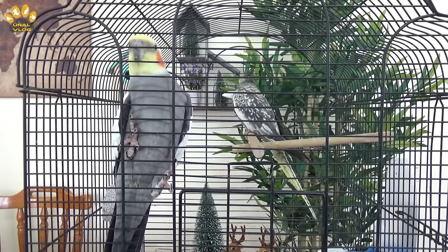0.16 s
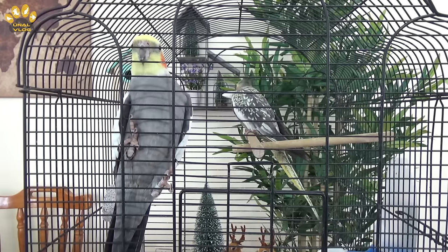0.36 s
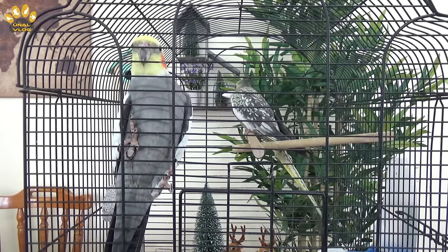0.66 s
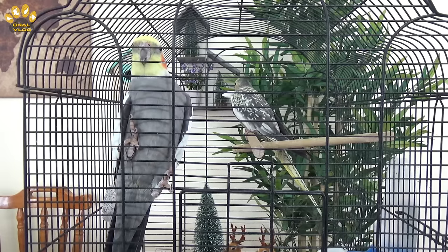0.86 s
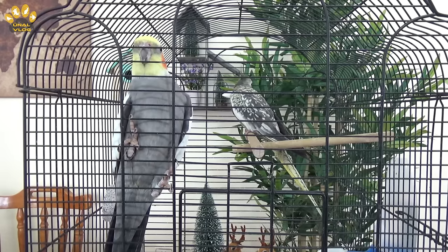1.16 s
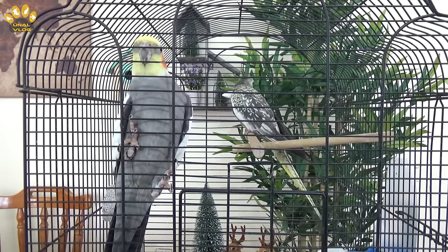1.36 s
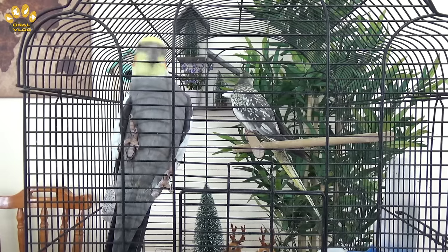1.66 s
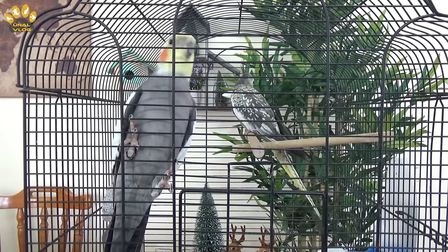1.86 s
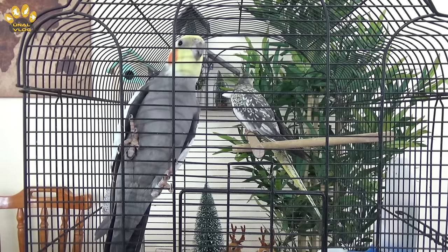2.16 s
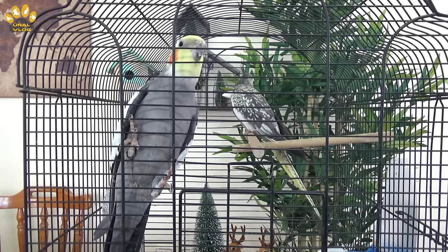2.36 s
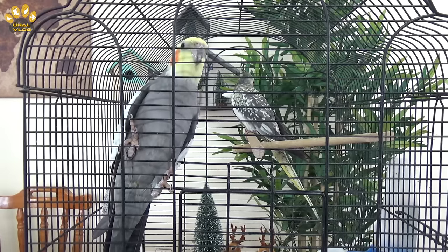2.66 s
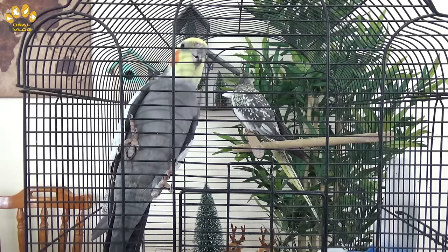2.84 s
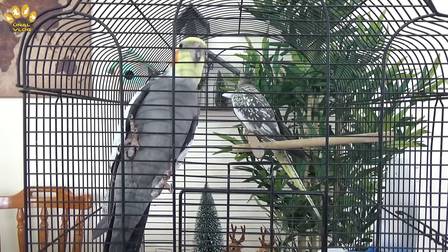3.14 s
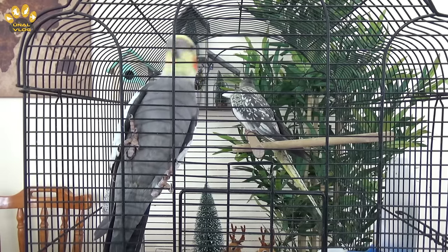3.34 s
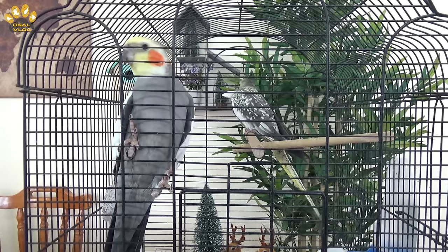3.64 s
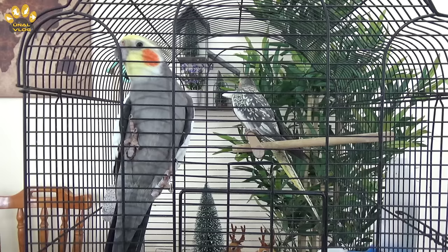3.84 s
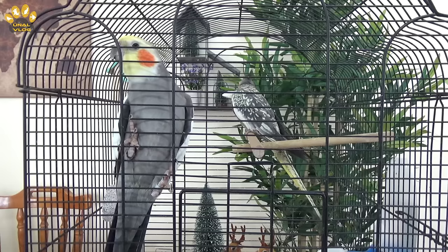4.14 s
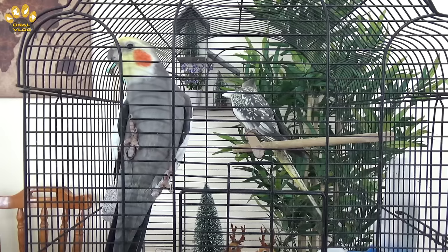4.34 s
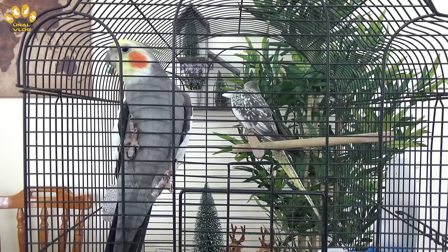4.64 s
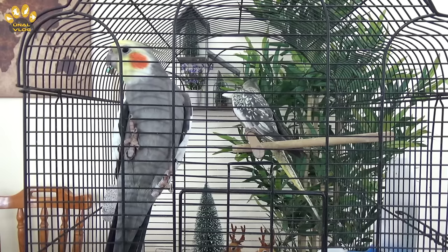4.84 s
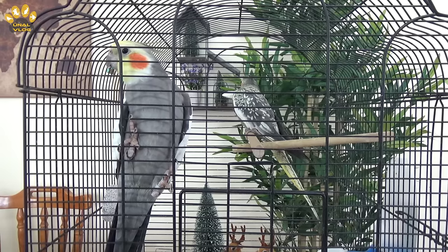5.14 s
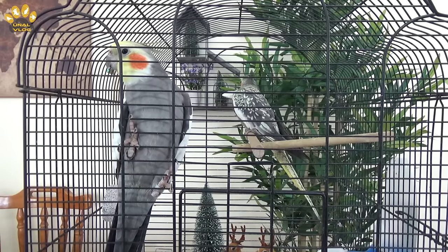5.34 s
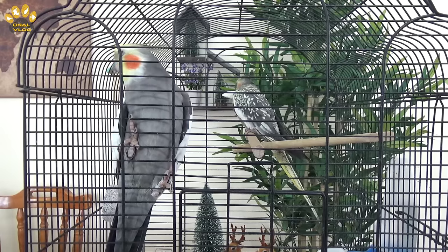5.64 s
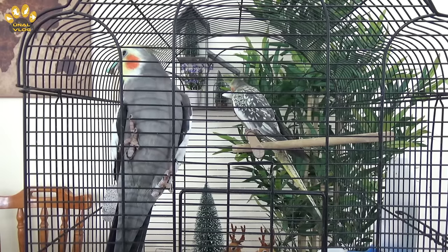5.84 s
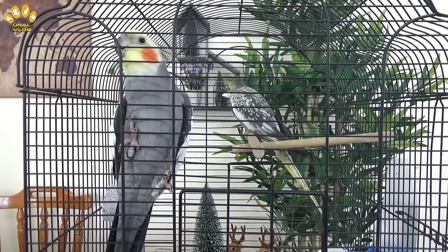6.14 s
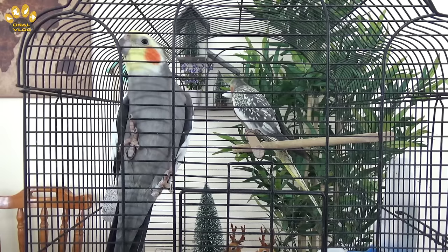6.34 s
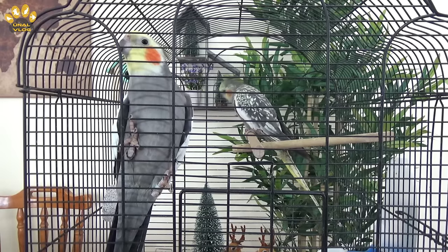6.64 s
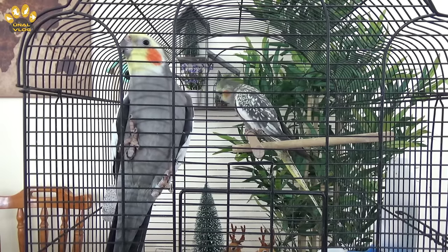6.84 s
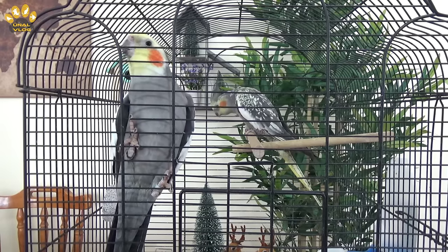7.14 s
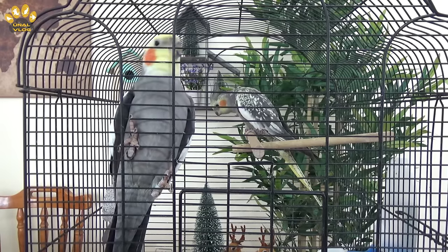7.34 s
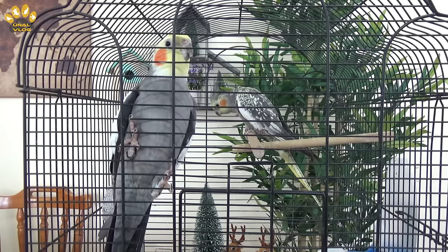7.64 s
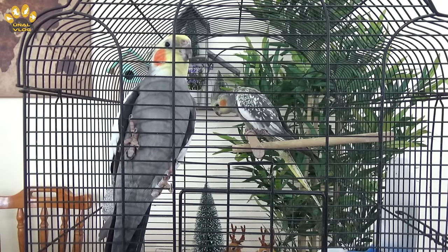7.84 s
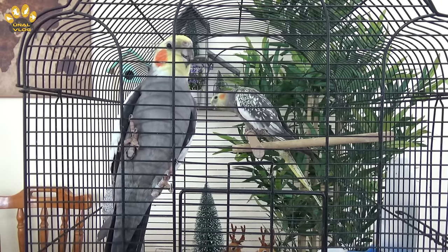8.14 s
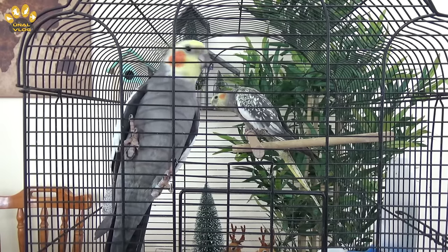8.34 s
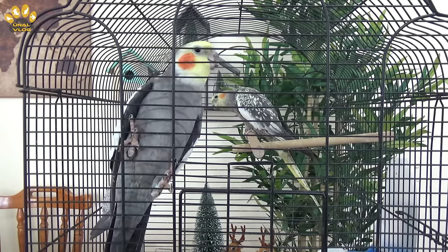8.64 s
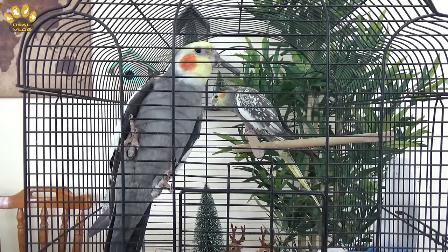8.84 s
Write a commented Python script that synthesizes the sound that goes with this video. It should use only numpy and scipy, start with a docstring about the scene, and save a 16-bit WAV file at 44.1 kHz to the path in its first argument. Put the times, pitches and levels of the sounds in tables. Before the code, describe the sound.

A cockatiel sings close by in a wire cage in a living room with faint steady noise and short reverberation. For the first 1.8 seconds it is quiet: a dull knock at 0.25, a soft hiss and chirp near 0.5, beak clicks, a raspier hiss at 1.25 and a wire tap at 1.6. Two loud, steeply falling whistles come at 1.8 and 2.0, then a rising held note at 2.2, a brief low note, a piercing high one at 2.8 and a warbling one at 3.15. Another falling pair at 3.85 and 4.05 leads to a softer held note at 4.3. From 5.1 to 5.8 there are small chirps and hisses. Whistles return at 5.9, with high notes at 6.1 and 7.0, held notes at 6.4 and 7.3, and rasps between. Quiet chirps follow from 7.8, then falling whistles at 8.5 and 8.7 and a short final note near 9.0.

```python
"""Clear whistles, raspy hisses and soft chirps: a cockatiel sings in a wire cage in a living room, close by.
Its beak clicks and taps the wires; soft rustles, dull knocks and steady room noise lie underneath.
Whistles and chirps are sine tones with overtones. Hisses, contacts and rustles are shaped noise.
The room rings briefly after every note, and a limiter holds down the loudest ones."""
import sys
import numpy as np
from scipy import signal
from scipy.fft import rfft, irfft
from scipy.io import wavfile
from scipy.ndimage import uniform_filter1d

SR = 44100
rng = np.random.default_rng(int(sys.argv[2]) if len(sys.argv) > 2 else 0)


def master(y):
    """Save y as 16-bit WAV."""
    cut = np.clip(np.atleast_2d(y).T, -1, 1)
    pcm = np.round(cut * 32767)  # scale
    wavfile.write(sys.argv[1], SR, pcm.astype(np.int16))


N = 396459
TIME = np.arange(N) / SR
CUTOFF_HZ = 15900  # nothing much is heard above this

# Colour of the steady room noise. Each row: frequency in Hz, level in dB.
ROOM_NOISE_COLOUR = [(25, -14.5), (50, -4.5), (80, -9), (120, -1), (250, -4.5), (600, -11.5), (1200, -13),
                     (2000, -7.5), (6000, -19), (10000, -25), (16000, -31.5)]
# How long the room rings. Each row: frequency in Hz, time to die away by 60 dB in seconds.
ROOM_DECAY = [(200, 0.26), (1500, 0.43), (3000, 0.35), (6000, 0.33), (10000, 0.29), (16000, 0.28)]

# Soft rustles. Each row: start in seconds, rise in seconds, level in dB,
# basic fade in dB per second (sped up or slowed down separately for low and high pitches).
RUSTLES = [(.45, 0.15, -50, 43.5), (3.49, 0.09, -49.5, 56), (4.58, .16, -44.5, 36),
           (5.501, 0.53, -55, 20.5)]
# Colour of the rustles. Each row: frequency in Hz, level in dB.
RUSTLE_COLOUR = [(100, -15.5), (300, -3), (750, -4), (1300, -1), (2200, -1), (4000, -17), (7000, -7),
                 (10000, -8.5), (16000, -14.5)]
# Faint ringing in the rustles. Each row: frequency in Hz, relative level in dB.
RUSTLE_RINGS = [(410, -10), (585, -2.5), (780, 1)]
RUSTLE_RISE_DB = 21  # each swells by this much
RUSTLE_SPLIT_HZ = 3500  # low and high parts fade at different speeds
RUSTLE_LOW_HASTE, RUSTLE_HIGH_HASTE = 0.89, 2.2  # times the basic fade

# Low flutter under the loudest notes. Each row: frequency in Hz, level in dB.
FLUTTER_COLOUR = [(40, -1), (130, 2), (300, -5.5), (700, -10.5), (2500, -48.5)]

# Dull knocks. Each row: start in seconds, level in dB, time to die to about a third in seconds.
KNOCKS = [(.245, -51, 0.04), (8.357, -54, 0.12)]
# Colour of the knocks. Each row: frequency in Hz, level in dB.
KNOCK_COLOUR = [(300, -10), (800, -13.5), (1700, 3.5), (3000, -5), (5000, -16), (16000, -34)]
# Dry beak clicks. Each row: start in seconds, level in dB, time to die to about a third in seconds.
BEAK_CLICKS = [(.711, -39, 0.0047), (.745, -33, 0.0018), (1.495, -29.5, 0.01), (2.0, -21.5, 0.00067),
               (2.982, -53, 0.0023), (2.992, -43, 0.003), (3.683, -39, 0.0026), (4.243, -43, 0.003),
               (4.311, -36, 0.0018), (4.572, -28.5, 0.0029), (4.878, -36.5, 0.0044), (5.863, -29.5, 0.0024),
               (6.249, -28.5, 0.0022), (7.157, -29, 0.0019)]
# Colour of the clicks. Each row: frequency in Hz, level in dB.
BEAK_CLICK_COLOUR = [(300, -41.5), (1000, -19.5), (1600, 9), (4000, 1), (7000, 2), (10000, -7),
                     (16000, -8.5)]
# Taps on the cage wires. Each row: start in seconds, level in dB, time to die to about a third in seconds.
WIRE_TAPS = [(1.58, -19.5, 0.02035), (1.79, -25, 0.013), (2.2, -30.5, 0.0377), (2.493, -26.5, .022)]
# Colour of the taps. Each row: frequency in Hz, level in dB.
WIRE_TAP_COLOUR = [(150, -29), (400, -0.5), (700, 1.5), (1500, 5), (3000, -3), (4800, -9), (7500, -0.5),
                   (11000, -0.5), (16000, -2)]

# Raspy hisses. Each row: start in seconds, rise in seconds, fall in seconds, level in dB,
# main throat resonance in Hz, focus on the resonances (0 plain hiss, 1 all resonance).
RASPS = [ (0.466, 0.02, 0.01, -35.5, 5400, 0.05), (1.249, 0.00092, 0.064, -24, 5840, 0.12),
         (5.27, 0.029, 0.01, -31.5, 6240, 0.02), (5.39, 0.01, 0.03, -32.5, 4840, 0.37),
         (5.408, 0.012, 0.016, -21, 6270, 0.96), (6.054, 0.0059, 0.094, -41, 6740, 0.1),
         (6.084, 0.017, 0.0083, -23, 5520, 0.24), (6.681, 0.054, 0.062, -25.5, 6174, 1),
         (6.837, 0.035, 0.067, -33, 5200, 0.07), (7.394, 0.035, 0.034, -30, 5730, 1),
         (7.626, 0.027, 0.049, -40.5, 6500, 0.2), ]
# Colour of the breath behind the hisses. Each row: frequency in Hz, level in dB.
BREATH_COLOUR = [(900, -26.5), (1500, -7.5), (2200, -2.5), (4000, -0.5), (6500, 3), (9000, -5.5),
                 (13000, -16.5), (16000, -25.5)]

# Soft chirps between the phrases. Each row: start in seconds, length in seconds, first pitch in Hz,
# middle pitch in Hz, last pitch in Hz, level in dB, overtone boost in dB, roughness (0 smooth, about 1 rough).
CHIRPS = [ (0.49, 0.032, 2330, 2455, 2730, -44.5, 1.5, 0.42),
          (.986, .08, 2850, 3680, 2100, -51.5, -12.5, 0.48),
          (1.151, 0.0357, 1490, 1420, 1380, -55, -18.5, 0.71),
          (5.135, 0.053, 3340, 2155, 1890, -57.5, -6, 0.31),
          (5.524, 0.08, 1930, 3095, 1938, -40, -19, 1.17),
          (5.674, 0.054, 3290, 2627, 2390, -47.5, -1.5, 0.71),
          (5.737, 0.0265, 1570, 1546, 1385, -48.5, -21, 0.5), (5.803, 0.027, 2960, 3820, 3830, -43, -13, 1),
          (7.79, .043, 3420, 3640, 3660, -53.5, -15.5, 0.42),
          (7.847, .099, 2040, 2353, 1862, -57.5, -26, 1.05),
          (7.96, 0.058, 3590, 3660, 3570, -49.5, -24, 0.71),
          (8.102, 0.077, 5610, 5810, 3620, -45.5, -6, 1.11), (8.191, .069, 3050, 3047, 2575, -53, -13, 1),
          (8.349, 0.24, 1840, 2180, 2065, -60.5, -19, 1.17), ]
# Throat colour of chirp overtones, before a boost that grows with order. Each row: frequency in Hz, level in dB.
CHIRP_OVERTONES = [(2800, 16.5), (5000, 7.5), (7500, 0), (10000, -17), (15000, -34)]

# Throat colour of whistle overtones, before a cut that grows with order. Each row: frequency in Hz, level in dB.
WHISTLE_OVERTONES = [(2500, -11), (3100, -29), (4000, -23.5), (5500, -27), (7000, -28.5), (8500, -31.5),
                     (11000, -29), (13500, -22), (16000, -37)]
EDGE_S = 0.0031  # the voice switches on and off this fast
PITCH_TREMOR, PITCH_TREMOR_PER_S = 0.0053, 85  # share of the pitch, turns per second
SHIMMER_DB, SHIMMER_PER_S = 1.5, 71  # tremor of the overtones

# Falling whistles in pairs. Each row: start in seconds, length in seconds, reference top pitch in Hz,
# level before fading in dB, reference fade in dB, treble boost at 9 kHz in dB.
SLURS = [ (1.818, 0.12, 2747, -7.5, 16, 1), (2, .146, 2865, -4.5, 21, 2.5),
         (3.85, 0.13, 2827, -9.5, 18, -4), (4.044, .145, 2914, -7.5, 20.5, -1),
         (8.529, 0.13, 2834, -7, 21.5, 1.5), (8.725, 0.14, 2853, -7, 23, 1), ]
# The fall every slur follows. Each row: share of its length, share of the top pitch, share of the fade.
SLUR_SHAPE = [(0, 0.99, 0.31), (.17, 0.9793, 0.11), (.31, .865, 0.13), (.47, .7, .58), (.68, .618, .68),
              (.88, .527, 0.81), (1, 0.45, 1.38)]

# Loud high notes with a dip. Each row: start in seconds, length in seconds, first pitch in Hz, dip pitch in Hz,
# last pitch in Hz, time to reach the dip in seconds, level after the attack in dB, treble boost at 9 kHz in dB.
HIGH_NOTES = [ (2.844, .136, 2792, 2490, 2630, .08, -11.5, 0), (6.112, .14, 2826, 2668, 2815, 0.049, -6, 0),
              (7.034, .128, 2835, 2642, 2764, 0.0502, -8, -2.5), ]
HIGH_HOLD_S = 0.013  # the pitch holds before the dip
HIGH_ATTACK_S, HIGH_ATTACK_DB = 0.012, 8.5  # the level comes up from this far below

# Held notes. Each row: start in seconds, length in seconds, first pitch in Hz, last pitch in Hz,
# bend (1 straight, more for a late glide, less for an early one), starting scoop in Hz, ending flick in Hz,
# warble reached at the end in Hz, mid-note level in dB, swell over the note in dB, treble boost at 9 kHz in dB.
HELD_NOTES = [ (2.24, 0.25, 1756, 1924, .35, 210, 268, 10.5, -12, 7, -2.5),
              (2.685, 0.05254, 1271, 1480, 3.2, -0.5, 457.5, 0.5, -24.5, -5.5, 0.5),
              (3.154, 0.26, 2049, 1975, 2.83, -35, 67.5, 36, -16, 0.5, 2),
              (4.292, .279, 1443, 1554, 0.93, 442, -110, 0.5, -25, 5, -4),
              (5.881, 0.135, 1869, 1994, 0.83, 13.5, -27.5, 25.5, -16.5, 4, 1.5),
              (6.417, 0.25, 1590, 1760, 5.62, 220.5, -280, 0.5, -21, 0, -5.5),
              (6.856, .065, 1250, 1345, 2, -1, 701.5, -2, -30, -3, -8),
              (7.303, 0.29, 1439, 1903, .8, 132.5, -130, 11.5, -21.5, 9.5, -0.5),
              (8.966, .06, 1774, 1732, 0.94, 84, 0, -9.5, -20, 1.5, 1.5), ]
SCOOP_S, FLICK_S = 0.028, 0.014  # slides on to its pitch, flicks off it
HELD_ATTACK_S, HELD_ATTACK_DB, HELD_RELEASE_DB = 0.03, 8.5, 3
WANDER, WANDER_DB, WANDER_PER_S = 0.0032, 1.08, 10  # slow straying: share of pitch, loudness, turns per second
WARBLE_PER_S, WARBLE_DB_PER_HZ = 10.59, -0.01  # the level drops slightly as the warble lifts the pitch


def from_db(db):
    """Turn decibels into gain."""
    return 10 ** (np.asarray(db) / 20)


def rms_one(x):
    """Scale a sound to an average strength (rms) of 1."""
    return x / np.sqrt(np.mean(x ** 2) + 1e-20)


def at_hz(points, hz):
    """Read a colour table at any frequency, on a log-frequency axis."""
    table_hz, value = np.transpose(points)
    return np.interp(np.log(np.maximum(hz, 1)), np.log(table_hz), value)


def at_time(rows, t):
    """Read the columns of a curve at the times t."""
    table_time, *columns = np.transpose(rows)
    return [np.interp(t, table_time, column) for column in columns]


def ramp(t, length):
    """Go from 0 to 1 over `length`, then stay."""
    return np.clip(t / length, 0, 1)


def noise(colour, size):
    """Make noise of a given colour, rms 1, by reshaping the spectrum of white noise."""
    white = rfft(rng.standard_normal(size))
    gain = from_db(at_hz(colour, np.fft.rfftfreq(size, 1 / SR)))
    return rms_one(irfft(white * gain, size))


def waver(rate, size=N):
    """Smooth chance movement with about `rate` turns a second, rms 1."""
    r = np.exp(-2 * np.pi * rate / SR)
    return rms_one(signal.lfilter([1], [1, -2 * r, r * r], rng.standard_normal(size)))


def resonate(x, hz, width_hz):
    """A resonance applied twice, for steep skirts; gain 1 at its peak."""
    r = np.exp(-np.pi * width_hz / SR)
    b = np.array([1, 0, -1]) * (1 - r * r) / 2
    a = [1, -2 * r * np.cos(2 * np.pi * hz / SR), r * r]
    return signal.lfilter(b, a, signal.lfilter(b, a, x))


def background(level_db=-65.5, side_db=-12.0):
    """Steady room noise: a shared middle plus a weaker part opposite in the two channels."""
    middle = noise(ROOM_NOISE_COLOUR, N)
    side = from_db(side_db) * noise(ROOM_NOISE_COLOUR, N) * [[1], [-1]]
    return from_db(level_db) * (middle + side)


def rustle_swells(haste):
    """Strength of the rustles over time, fading `haste` times as fast as the basic fade."""
    total = np.zeros(N)
    for start, rise, level_db, fade in RUSTLES:
        t = TIME - start
        rise_db = -RUSTLE_RISE_DB * (1 - ramp(t, rise))
        fade_db = -haste * fade * np.maximum(t - rise, 0)
        total += from_db(level_db + rise_db + fade_db) * (t > 0)
    return total


def rustles(grain_db=3.0, ring_db=8.0, ring_width_hz=35):
    """Grainy noise that swells and fades, the treble faster, with a few faint resonances."""
    grains = from_db(grain_db * waver(250)) * noise(RUSTLE_COLOUR, N)
    low_pass = signal.butter(3, RUSTLE_SPLIT_HZ, "low", fs=SR, output="sos")
    high_pass = signal.butter(3, RUSTLE_SPLIT_HZ, "high", fs=SR, output="sos")
    low = rustle_swells(RUSTLE_LOW_HASTE) * signal.sosfilt(low_pass, grains)
    high = rustle_swells(RUSTLE_HIGH_HASTE) * signal.sosfilt(high_pass, grains)
    rings = np.zeros(N)
    for hz, db in RUSTLE_RINGS:
        rings += from_db(ring_db + db) * resonate(low, hz, ring_width_hz)
    return low + high + rings


def low_flutter(song, flutter_db=-39.5):
    """Faint, lumpy low noise whose strength follows the power of the whistles, up to a limit."""
    power = uniform_filter1d(song ** 2, size=400)
    lumps = from_db(flutter_db + 4.3 * waver(60))
    return lumps * np.minimum(power, 0.15) * noise(FLUTTER_COLOUR, N)


def contacts(events, colour):
    """Each contact is a sudden burst of fine chatter that dies away exponentially."""
    out, chatter = np.zeros(N), noise(colour, N)
    for start, level_db, length in events:
        on = (TIME >= start) & (TIME < start + 10 * length)
        decay = np.exp((start - TIME[on]) / length)
        out[on] += from_db(level_db) * decay * chatter[on]
    return out


def wire_taps(lag_s=0.014):
    """Bending waves in a wire run slower at low pitch, so a tap sweeps downwards."""
    hz = np.fft.rfftfreq(N, 1 / SR)
    # No delay from 4 kHz up; half of lag_s at 1 kHz
    delay = lag_s * np.maximum(np.sqrt(1000 / np.maximum(hz, 100)) - 0.5, 0)
    # Adding up the delay over frequency gives the phase turn that causes it
    phase = 2 * np.pi * np.cumsum(delay) * SR / N
    return irfft(rfft(contacts(WIRE_TAPS, WIRE_TAP_COLOUR)) * np.exp(-1j * phase), N)


def rasps(grain_db=0.5):
    """Fluttering hiss through a throat with weaker resonances an octave either side of the main one."""
    out, hiss = np.zeros(N), noise(BREATH_COLOUR, N) * from_db(grain_db * waver(180))
    for start, rise, fall, level_db, hz, focus in RASPS:
        on = (TIME >= start) & (TIME < start + rise + 2 * fall)
        t, air = TIME[on] - start, rms_one(hiss[on])
        throat = resonate(air, hz, 1600)
        throat += 0.47 * resonate(air, hz / 2, 1300)
        throat += 0.53 * resonate(air, 2 * hz, 2200)
        swell = np.minimum(t / rise, 1) * np.exp(-2 * (np.maximum(t - rise, 0) / fall) ** 2)
        rasp = np.sqrt(focus) * rms_one(throat) + np.sqrt(1 - focus) * air
        out[on] += from_db(level_db) * swell * rasp
    return out


def syrinx(pitch, overtones, brightness_db, tilt_db):
    """The bird's voice: a sine plus overtones shaped by the throat, with a tilt from order to order."""
    phase = 2 * np.pi * np.cumsum(pitch) / SR
    tone = np.sin(phase)
    for order in np.arange(2, 11):
        hz = order * pitch
        overtone_db = at_hz(overtones, hz) + brightness_db(hz) + tilt_db * (order - 2) / 2
        tone += from_db(overtone_db) * (hz < CUTOFF_HZ) * np.sin(order * phase)
    return np.sqrt(2) * tone


def chirps(jitter=0.05, shimmer_db=4.4):
    """Muttered arcs of pitch; the rough ones jump about in pitch and loudness."""
    out, tremor, shimmer = np.zeros(N), waver(330), waver(320)
    for start, length, first_hz, middle_hz, last_hz, level_db, overtones_db, rough in CHIRPS:
        on = (TIME > start) & (TIME < start + length)
        along = (TIME[on] - start) / length
        arc = np.interp(along, [0, 0.5, 1], [first_hz, middle_hz, last_hz])
        pitch = arc * (1 + rough * jitter * tremor[on])
        arch = np.sqrt(np.abs(np.sin(np.pi * along)))
        swell = arch * from_db(level_db + rough * shimmer_db * shimmer[on])
        out[on] += swell * syrinx(pitch, CHIRP_OVERTONES, lambda hz: overtones_db, tilt_db=5.5)
    return out


def note_time(length):
    """Seconds since the start of a note."""
    return np.arange(int(length * SR)) / SR


def add_whistle(out, start, pitch, level_db, treble_db):
    """Sing one smooth, slightly trembling glide into `out`; treble_db brightens or dulls its overtones."""
    t, first = np.arange(len(pitch)) / SR, int(start * SR)
    tremor = waver(PITCH_TREMOR_PER_S, size=SR)[-len(t):]
    shimmer = waver(SHIMMER_PER_S, size=SR)[-len(t):]
    pitch = uniform_filter1d(pitch, size=400, mode="nearest") * (1 + PITCH_TREMOR * tremor)
    gate = np.sin(np.pi / 2 * ramp(np.minimum(t, t[-1] - t), EDGE_S))

    def brightness_db(hz):
        """The treble boost grows with frequency, and the shimmer moves all overtones."""
        return treble_db * hz / 9000 + SHIMMER_DB * shimmer

    tone = syrinx(pitch, WHISTLE_OVERTONES, brightness_db, tilt_db=-4.5)
    out[first:first + len(t)] += (from_db(level_db) * gate * tone)[:N - first]


def held_notes():
    """Each slides on to its pitch, glides while its level drifts and it warbles, and ends in a quick flick."""
    out = np.zeros(N)
    for (start, length, first_hz, last_hz, bend, scoop_hz, flick_hz, warble_hz,
         level_db, swell_db, treble_db) in HELD_NOTES:
        t = note_time(length)
        along, ending = t / length, ramp(t - length + FLICK_S, FLICK_S)
        stray = waver(WANDER_PER_S, size=SR)[-len(t):]
        warble = warble_hz * along * np.cos(2 * np.pi * WARBLE_PER_S * t)
        glide = first_hz + (last_hz - first_hz) * along ** bend
        scoop = scoop_hz * (1 - ramp(t, SCOOP_S))
        pitch = glide * (1 + WANDER * stray) + scoop + flick_hz * ending + warble
        attack_db = -HELD_ATTACK_DB * (1 - ramp(t, HELD_ATTACK_S))
        envelope_db = swell_db * (along - 0.5) + attack_db - HELD_RELEASE_DB * ending
        wander_db = WANDER_DB * stray + WARBLE_DB_PER_HZ * warble
        add_whistle(out, start, pitch, level_db + envelope_db + wander_db, treble_db)
    return out


def high_notes():
    """Full-force notes: the pitch holds, eases down into a dip and climbs steadily again."""
    out = np.zeros(N)
    for start, length, first_hz, dip_hz, last_hz, dip_s, level_db, treble_db in HIGH_NOTES:
        t = note_time(length)
        sink = np.sin(np.pi / 2 * ramp(t - HIGH_HOLD_S, dip_s - HIGH_HOLD_S)) ** 2
        climb = ramp(t - dip_s, length - dip_s)
        pitch = first_hz + (dip_hz - first_hz) * sink + (last_hz - dip_hz) * climb
        attack_db = -HIGH_ATTACK_DB * (1 - ramp(t, HIGH_ATTACK_S))
        add_whistle(out, start, pitch, level_db + attack_db, treble_db)
    return out


def slurs():
    """Each slur starts near its top pitch and falls a little over an octave, fading as it goes."""
    out = np.zeros(N)
    for start, length, top_hz, level_db, fade_db, treble_db in SLURS:
        fall, fade = at_time(SLUR_SHAPE, note_time(length) / length)
        add_whistle(out, start, top_hz * fall, level_db - fade_db * fade, treble_db)
    return out


def room(x, wet_db, treble_db, side_db, gap_s=0.0042):
    """Dense wall reflections, each band with its own decay; nearly alike at two close microphone ports."""
    t = TIME[:SR * 3 // 4]
    hz = np.fft.rfftfreq(len(t), 1 / SR)
    white = rfft(rng.standard_normal((2, len(t))))
    centres, tail = np.array(ROOM_DECAY)[:, 0], 0
    for share, (centre, t60) in zip(np.eye(len(centres)), ROOM_DECAY):
        decay = from_db(-60 * t / t60) * (t > gap_s)  # a short gap before the first reflection
        decay = decay / np.sqrt(np.sum(decay ** 2))
        band = irfft(white * np.interp(hz, centres, share), len(t))
        tail = tail + band * decay * from_db(treble_db * (centre > 4500))
    mid, side = signal.fftconvolve(x[None], tail, axes=1)[:, :N]
    return from_db(wet_db) * (mid + from_db(side_db) * side * [[1], [-1]])


def scene():
    """The bird sits a little left of centre; its hisses and chirps spread into the room more than its whistles."""
    song = slurs() + high_notes() + held_notes()
    close = song + wire_taps()
    noises = chirps() + rasps()
    noises += contacts(BEAK_CLICKS, BEAK_CLICK_COLOUR) + contacts(KNOCKS, KNOCK_COLOUR)
    reflections = room(close, wet_db=-12.0, treble_db=-2.0, side_db=-27.5)
    reflections += room(noises, wet_db=1.5, treble_db=-3.0, side_db=-18.5)
    pan = from_db([[0.54], [-0.54]])  # left, right
    bird = (close + noises + reflections) * pan
    return bird + low_flutter(song) + rustles() + background()


def record(dry, ceiling_db=-9.0, release_db_per_s=148.5):
    """A fast limiter flattens the loudest whistles, then a steep filter cuts the top."""
    level_db = 20 * np.log10(np.abs(dry.mean(axis=0)) + 1e-9)
    over_db = np.maximum(level_db - ceiling_db, 0)
    # Hold each peak and let go at a steady number of dB per second
    release_db = release_db_per_s * TIME
    held_db = np.maximum.accumulate(over_db + release_db) - release_db
    limited = dry * from_db(-uniform_filter1d(held_db, size=64))
    top_cut = signal.ellip(10, 0.1, 80, CUTOFF_HZ, fs=SR, output="sos")
    return signal.sosfilt(top_cut, limited)


dry = scene()
out = record(dry)
master(out)
```